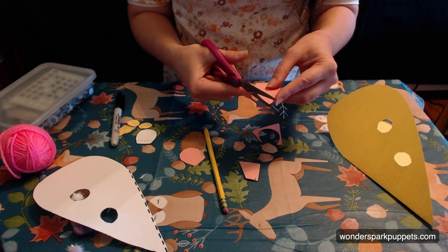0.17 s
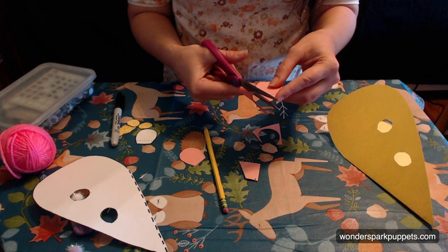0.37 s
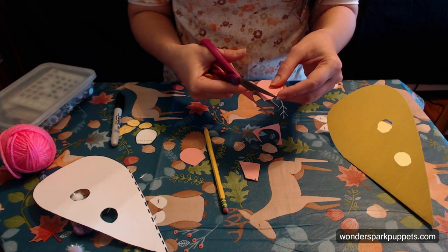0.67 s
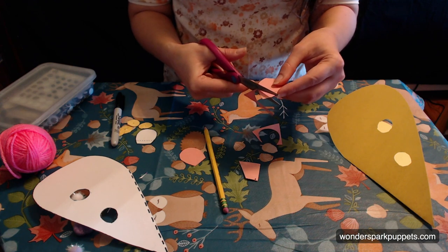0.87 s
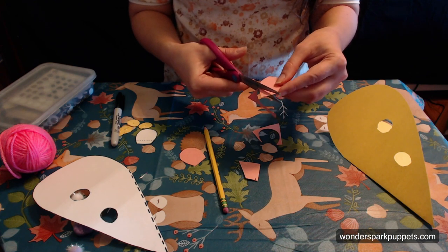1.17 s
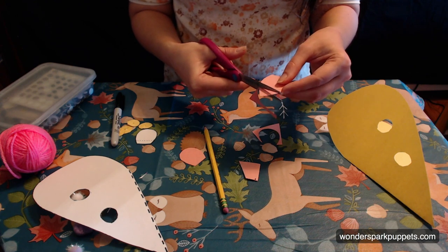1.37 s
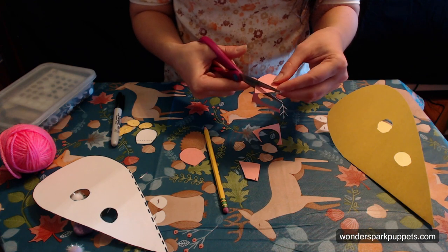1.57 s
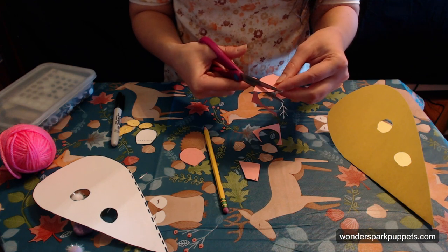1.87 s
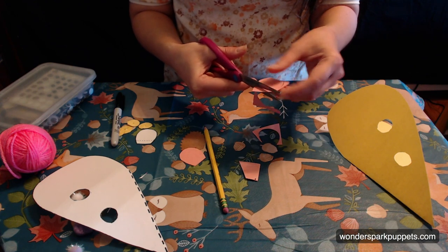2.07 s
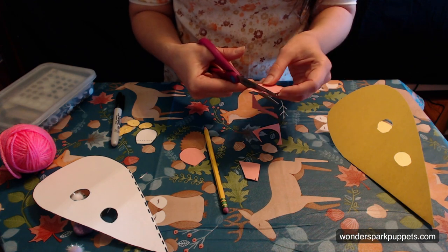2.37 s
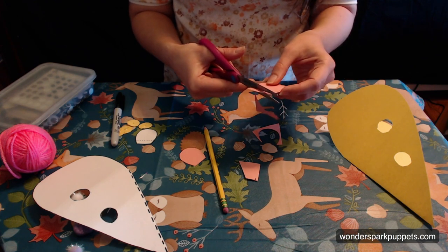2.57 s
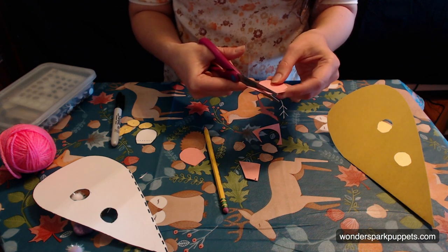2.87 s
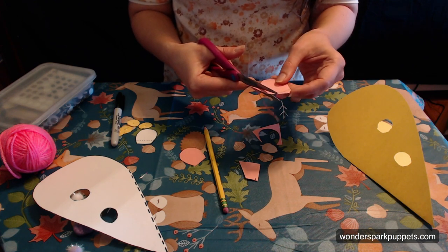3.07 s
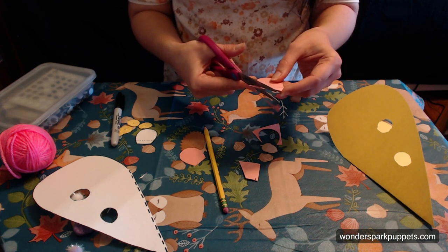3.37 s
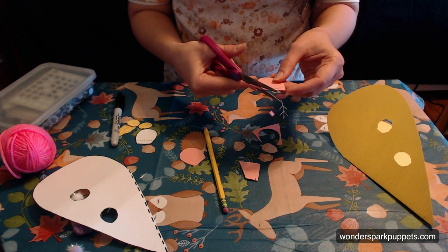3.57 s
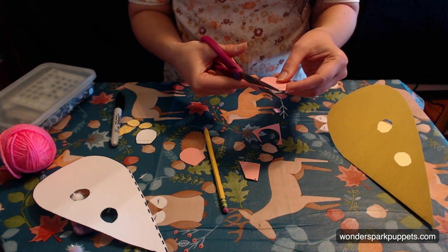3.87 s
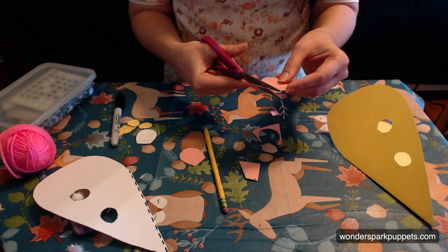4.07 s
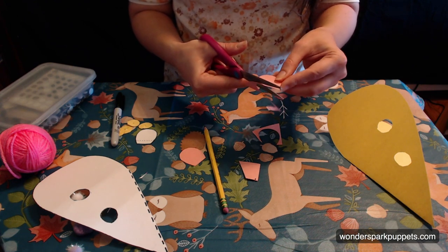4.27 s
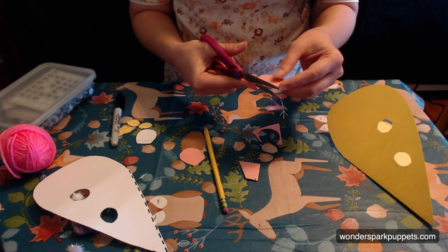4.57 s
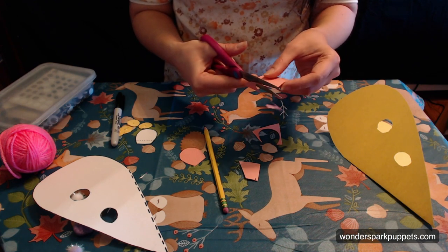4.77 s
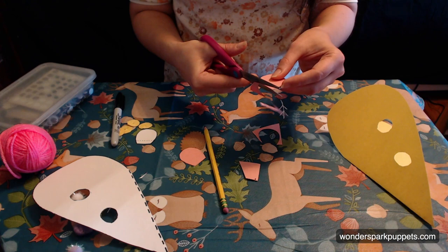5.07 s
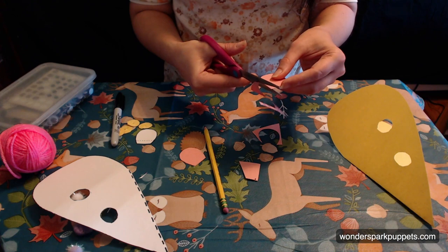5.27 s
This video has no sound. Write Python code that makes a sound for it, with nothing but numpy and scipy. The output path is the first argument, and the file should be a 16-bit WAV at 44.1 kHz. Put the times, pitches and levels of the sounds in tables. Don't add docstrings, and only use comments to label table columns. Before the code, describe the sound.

Close, dry little cuts, snaps and paper rustles from scissors on stiff paper, uneven in rhythm, with soft low room hum beneath.

```python
import sys
import numpy as np
from scipy import signal
from scipy.fft import rfft, irfft
from scipy.io import wavfile
from scipy.ndimage import uniform_filter1d

SR = 44100
rng = np.random.default_rng(int(sys.argv[2]) if len(sys.argv) > 2 else 0)


def volts_from_db(level):
    exponent = np.asarray(level, float) / 20
    return 10 ** exponent


def transcribe(u):
    v = np.clip(np.atleast_2d(u).T, -1, 1)
    q = np.round(v * 32767).astype(np.int16)
    wavfile.write(sys.argv[1], SR, q)


N = 238168

# (time [s], hiss level [dB])
FINGER_PRESSURE = [(0, -67.5), (.45, -70), (.7, -69.5), (.8, -73), (1.05, -79), (1.2, -70), (1.7, -69.5),
                   (1.93, -69), (1.97, -72), (2.2, -68), (2.4, -71.5), (2.53, -67.5), (3.07, -71),
                   (3.4, -71), (3.9, -68.5), (4.4, -69), (4.9, -67.5), (5.4, -68)]


def rms_one(x):
    return x / np.sqrt(np.mean(x ** 2) + 1e-20)


def coloured(points):
    hz = np.arange(N // 2 + 1) * SR / N + 0.1
    at, db = np.transpose(points)
    weight = volts_from_db(np.interp(np.log(hz), np.log(at), db))
    return rms_one(irfft(rfft(rng.standard_normal(N)) * weight, N))


def resonate(x, hz, width_hz):
    r = np.exp(-np.pi * width_hz / SR)
    numerator = [(1 - r * r) / 2, 0, (r * r - 1) / 2]
    denominator = [1, -2 * r * np.cos(2 * np.pi * hz / SR), r * r]
    return signal.lfilter(numerator, denominator, x)


def band(x, low_hz, high_hz):
    return signal.sosfilt(signal.butter(2, [low_hz, high_hz], "band", fs=SR, output="sos"), x)


def flutter(rate_hz):
    r = np.exp(-2 * np.pi * rate_hz / SR)
    slow = signal.lfilter([1], [1, -2 * r, r * r], rng.standard_normal(N + SR))
    return rms_one(slow[SR:])


def in_time(rows):
    s, *columns = np.transpose(rows)
    return [np.interp(np.arange(N) / SR, s, column) for column in columns]


def ventilation():
    # (frequency [Hz], density [dB per Hz])
    room_air = [(26, -14), (48, -10.5), (85, -13), (125, -19), (220, -25.5), (380, -31.5), (710, -43.5),
                (1030, -35), (1500, -38.5), (2350, -37.5), (2850, -45), (4000, -43), (6000, -56.5),
                (11000, -84)]
    # (frequency [Hz], width [Hz], rms level [dB])
    room_tones = [(65.7, 14.7, -62), (197.2, 26.7, -71), (260.6, 12.5, -70.5), (328.7, 22, -74.5),
                  (850, 15, -83.5), (992, 12, -80.5), (1198, 108, -75.5), (2267, 300, -76.5),
                  (2456, 270, -77), (824, 230, -75.5)]
    # (time [s], rumble level [dB], draught level [dB])
    gusts = [(0.0, -47.5, -65), (0.04, -44, -65.5), (0.98, -35, -68), (1.31, -41, -66), (2.92, -37.5, -63),
             (3.01, -47, -64), (3.59, -36.5, -64.5), (4.18, -47.5, -63.5), (4.53, -39, -65.5),
             (5.02, -38.5, -66), (5.13, -46, -65.5), (5.4, -49, -64.5)]
    # (frequency [Hz], density [dB per Hz])
    rumble_colour = [(3, -2.5), (8, 9), (17, 8.5), (27, 3.5), (42, -27), (80, -54)]
    draught_colour = [(250, -21.5), (450, 0), (850, -2.5), (1100, -12), (1800, -57)]

    air = volts_from_db(-56) * coloured(room_air)
    white = rng.standard_normal(N)
    tones = np.zeros(N)
    for hz, width_hz, db in room_tones:
        mode = resonate(resonate(white, hz, width_hz), hz, 2 * width_hz)
        tones += volts_from_db(db) * rms_one(mode)

    hum_hz = 66 + 3.51 * flutter(5.28)
    hum = volts_from_db(-54.5 + 1.43 * flutter(9.6)) * np.sin(2 * np.pi * np.cumsum(hum_hz) / SR)
    whine_hz = 2308
    whine = volts_from_db(-75.5 + 2.7 * flutter(8.3)) * np.sin(2 * np.pi * whine_hz * np.arange(N) / SR)

    rumble_db, draught_db = in_time(gusts)
    rumble = volts_from_db(rumble_db) * coloured(rumble_colour)
    draught = volts_from_db(draught_db - 4.0) * coloured(draught_colour)
    return air + tones + whine + hum + rumble + draught


def fibres(per_s, spread_db):
    strength = volts_from_db(spread_db * np.minimum(rng.exponential(1, N), 4))
    sign = rng.choice([-1, 1], N)
    return strength * sign * (rng.random(N) < per_s / SR) + 1e-18


def card(per_s, spread_db, swell_db):
    # (frequency [Hz], width [Hz], level [dB])
    modes = [(1350, 320, -2.5), (1904, 280, 1), (2118, 200, 0), (2950, 250, -2.5), (3870, 620, 2),
             (5040, 920, 0.5), (5400, 210, 0.5), (5960, 1360, 0.5), (7820, 640, 2), (8000, 125, 0),
             (8700, 840, 2.5), (9420, 220, 0), (10140, 920, 2), (11500, 520, -2)]
    parts = np.zeros((3, N))
    breaks = fibres(per_s, spread_db)
    for k, (hz, width_hz, db) in enumerate(modes):
        part = int(hz > 2500) + int(hz > 6500)
        swell = volts_from_db(db + swell_db * flutter(6.9))
        parts[part] += (-1) ** k * swell * rms_one(resonate(breaks, hz, width_hz))
    return [rms_one(p) for p in parts]


def hiss(parts, rows):
    mid_db, treble_db, body_db = in_time(rows)
    body, mid, treble = parts
    return volts_from_db(mid_db) * (mid + volts_from_db(treble_db) * treble + volts_from_db(body_db) * body)


def sliding():
    treble_db, body_db = -1, -3.5
    rows = [(s, db, treble_db, body_db) for s, db in FINGER_PRESSURE]
    rustle = hiss(card(per_s=9000, spread_db=2.5, swell_db=1.0), rows)
    return volts_from_db(-5 + 1.1 * flutter(36)) * rustle


def shear():
    # (entry time [s], fullest time [s], exit time [s], hiss level [dB], treble over mid [dB])
    strokes = [(0.04, 0.06, 0.098, -64, -1), (.06, 0.108, 0.13, -60.5, -3), (.31, 0.327, .38, -67, 2),
               (.4, .44, .52, -75, -1), (.64, 0.67, .69, -71.5, -2), (1.07, 1.114, 1.2, -70, 0),
               (1.262, 1.27, 1.36, -70, 0), (1.35, 1.362, 1.4, -67, -3), (1.512, 1.53, 1.65, -61.5, -1),
               (1.527, 1.544, 1.63, -56, 3), (1.545, 1.59, 1.609, -55.5, 3.5),
               (1.62, 1.64, 1.62, -62, -1.5), (1.822, 1.86, 1.94, -65, -4), (1.968, 1.975, 2.04, -67, -1),
               (2.03, 2.038, 2.1, -68, 0), (2.117, 2.174, 2.26, -68, 2.5), (2.267, 2.29, 2.38, -67.5, 0),
               (2.335, 2.36, 2.35, -65, -4), (2.4, 2.412, 2.4, -67, -2), (2.557, 2.599, 2.64, -71, 1.5),
               (2.724, 2.73, 2.66, -64, -2), (2.776, 2.787, 2.88, -64, 3), (2.846, 2.868, 2.91, -64, -2),
               (2.912, 2.926, 2.9, -65, -1), (2.947, 2.96, 3.05, -61, 3.5), (3.106, 3.13, 3.22, -64, 2),
               (3.153, 3.196, 3.24, -59.5, 2.5), (3.2, 3.235, 3.26, -59.5, 3.5),
               (3.42, 3.43, 3.52, -66.5, 1), (3.54, 3.58, 3.6, -67.5, 2), (3.785, 3.8, 3.8, -66, -1),
               (4.004, 4.014, 4.1, -72, 0), (4.175, 4.193, 4.3, -64.5, 2), (4.19, 4.235, 4.2, -63, 1),
               (4.24, 4.288, 4.315, -62, 3), (4.478, 4.5, 4.43, -67, 5), (4.602, 4.723, 4.6, -70.5, -1),
               (4.92, 4.94, 4.87, -69.5, 6.5), (5.352, 5.38, 5.5, -61, .6)]
    entry_db, exit_db = -7.5, -8
    fade_db_per_s = 1602
    body_at_59_db, body_loss = -7, 0.28

    s = np.arange(0, N / SR + 0.002, 0.002)
    outline_db = np.array([-fade_db_per_s / 10, entry_db, 0, exit_db, -fade_db_per_s / 5])
    swells = []
    for entry, fullest, leave, db, _ in strokes:
        corners = [entry - 0.1, entry, fullest, leave, leave + 0.1]
        swells.append(np.interp(s, corners, db + outline_db))
    level_db = np.max(swells, axis=0)

    _, fullest, _, db, treble_db = np.transpose(strokes)
    body_db = body_at_59_db - body_loss * (db + 59.0)
    rows = np.transpose([s, level_db, np.interp(s, fullest, treble_db), np.interp(s, fullest, body_db)])
    stick_slip = volts_from_db(0.85 * flutter(66))
    return stick_slip * hiss(card(per_s=9000, spread_db=3.0, swell_db=0.5), rows)


def singing():
    # (time [s], length [s], frequency [Hz], rms level [dB])
    blade_tones = [(.04, 0.033, 4200, -72), (0.067, 0.055, 3880, -70), (.075, 0.05, 8400, -67.5),
                   (.07, .04, 6700, -69), (0.08, 0.043, 1405, -67), (.335, .04, 10250, -72),
                   (1.086, .04, 4050, -70), (1.354, 0.019, 8500, -66), (1.355, .025, 6000, -71),
                   (1.527, .045, 3920, -62), (1.533, 0.045, 4640, -61), (1.542, 0.056, 7730, -61),
                   (1.532, .03, 9250, -62), (1.559, .045, 10100, -63), (1.565, 0.054, 5120, -65.5),
                   (1.543, 0.015, 1880, -64), (1.589, 0.021, 1610, -60.5), (1.538, 0.064, 3080, -67),
                   (1.57, 0.04, 11300, -63), (1.885, 0.011, 1890, -60), (1.965, 0.0079, 1900, -67),
                   (1.975, .02, 2950, -69), (2.077, 0.019, 2850, -63), (2.41, 0.017, 2070, -64),
                   (2.562, 0.015, 2100, -66), (2.59, 0.027, 8800, -73), (2.64, 0.023, 8900, -70),
                   (2.783, 0.028, 3160, -64), (2.784, 0.022, 4400, -61), (2.784, 0.011, 5480, -59),
                   (2.782, .012, 8160, -54), (2.871, .012, 9200, -58), (2.95, .015, 2060, -73),
                   (3.171, 0.22, 2273, -73), (3.175, .02, 8800, -66), (3.422, .015, 2660, -64),
                   (3.55, .01, 8400, -65), (3.572, 0.012, 1980, -62.5), (3.576, .03, 10200, -62),
                   (3.575, 0.026, 3750, -68), (3.618, 0.024, 9150, -63), (4.141, 0.016, 3460, -68),
                   (1.54, 0.051, 5900, -66), (4.234, 0.033, 3630, -71), (4.239, 0.064, 10240, -69),
                   (4.265, .025, 8850, -70), (4.27, .03, 10200, -68), (4.289, 0.0088, 1830, -61),
                   (5.356, 0.082, 1935, -66), (5.359, 0.077, 4020, -68), (5.362, 0.035, 7240, -65)]
    # (time [s], length [s], frequency [Hz], rms level [dB])
    table_hums = [
        (3.12, 0.15, 78, -62),
        (3.28, 0.12, 95, -59.5),
        (3.47, 0.1, 104, -59),
        (3.55, 0.12, 89, -57),
        (2.3, 0.14, 68, -57),
    ]
    rise = 0.15
    size = 6000
    out = np.zeros(N + SR)
    for s, length_s, hz, db in blade_tones + table_hums:
        u = np.arange(size) / SR / max(length_s, 0.004)
        rub = rng.standard_normal(size) * np.sqrt(np.interp(u, [0, rise, 1], [0, 1, 0]))
        width_hz = 49 + 25.2 * hz / 1000
        tone = resonate(resonate(rub, hz, width_hz), hz, 2 * width_hz)
        i = round(s * SR)
        out[i:i + size] += volts_from_db(db) * rms_one(tone) * np.sqrt(length_s * SR / size)
    return out[:N]


def tear(length_ms, peak_db, size=1400, lead=256):
    t = (np.arange(size) - lead) / SR
    decay_s = max(length_ms, 0.3) / 1000
    rise_s = 0.00083 + 0.27 * decay_s * np.clip((-41 - peak_db) / 8, 0.05, 1)
    shape = np.exp(np.where(t < 0, t / rise_s, -t / (0.92 * decay_s)))
    return rng.standard_normal(size) * volts_from_db(2.0 * rng.standard_normal(size)) * shape


def add(out, s, peak_db, burst, lead=256):
    i = round(s * SR) - lead
    crest = 2 * np.sqrt(uniform_filter1d(burst ** 2, size=48).max())
    out[i:i + len(burst)] += volts_from_db(peak_db) * burst / crest


def strays():
    count, over_slide_db, spread_db = 8, 9, -1
    when, size, pitch = rng.random((count, 3)).T
    s = 0.01 + when * (N / SR - 0.02)
    db = np.interp(s, *np.transpose(FINGER_PRESSURE)) + over_slide_db - spread_db * np.log(size)
    return list(zip(s, np.minimum(db, -53), 3300 * 3.1 ** pitch))


def ticks():
    # (time [s], peak level [dB], ring frequency [Hz])
    brief_ticks = [(0.043, -47, 4140), (0.051, -51, 4250), (.109, -44, 4020), (.312, -53, 9500),
                   (.358, -49, 10300), (0.365, -46, 10300), (.43, -54, 8500), (.481, -52, 8000),
                   (1.082, -48, 8700), (1.092, -53, 4100), (1.122, -49, 6000), (1.141, -48, 8600),
                   (1.227, -43.5, 2350), (1.264, -45.5, 8600), (1.267, -45, 4090), (1.281, -48, 9500),
                   (1.301, -47, 5500), (1.83, -44, 5530), (1.8345, -43, 5000), (1.919, -46, 3480),
                   (2.072, -43, 7700), (2.2732, -42.5, 3960), (2.354, -45, 3200), (2.413, -47, 7500),
                   (2.458, -53, 8000), (2.495, -51, 8800), (2.644, -46, 3200), (2.654, -50, 8900),
                   (2.705, -46, 3450), (2.739, -42, 6070), (2.822, -47, 6500), (2.85, -44, 10400),
                   (2.949, -44, 3800), (3.103, -53, 9500), (3.4643, -43, 6630), (3.646, -42, 10340),
                   (3.676, -47, 9300), (3.728, -46, 9800), (3.8, -49, 6800), (3.864, -54, 8700),
                   (4.0, -47, 6500), (4.009, -46, 3900), (4.0248, -43.5, 6720), (4.033, -56, 9000),
                   (4.07, -53, 10500), (4.103, -53, 9000), (4.142, -47.5, 3380), (4.503, -44, 6540),
                   (4.524, -48, 7000), (4.582, -44.5, 7100), (4.8005, -44, 8690), (4.805, -45, 3870),
                   (4.924, -47, 9600), (4.941, -49, 9500), (4.991, -43, 9300), (5.159, -47, 6500),
                   (5.172, -48, 7480),
                   (.3506, -48, 10250), (.4335, -54, 3960), (.439, -54, 2330), (.6607, -53, 4180),
                   (.9578, -55, 2930), (1.1193, -51, 4090), (1.8173, -52, 3750), (1.86, -45, 4090),
                   (2.3651, -48, 4390), (2.5554, -49, 8700), (2.6107, -52, 8900), (2.6964, -48, 3570),
                   (2.8715, -45, 7000), (3.0317, -48, 10100), (3.4885, -50, 5512), (3.7321, -48, 6070),
                   (3.7875, -47, 9000), (3.861, -51, 2070), (4.0057, -49, 6680), (4.3567, -53, 8800),
                   (4.3656, -52, 2150), (4.7562, -49, 2894), (4.8498, -52, 3570), (4.8834, -49, 3400),
                   (5.089, -46, 8180), (5.1996, -54, 2240), (5.2115, -55, 4000)]
    out = np.zeros(N + 2048)
    for s, peak_db, hz in brief_ticks + strays():
        release = tear(1.86, peak_db)
        ring = volts_from_db(9.5) * resonate(release, hz, 520)
        add(out, s, peak_db - 4.5, band(release, 1800, 11400) + ring)
    return out[:N]


def snaps():
    # (time [s], peak level [dB], low ring [Hz], high ring [Hz], treble over mid [dB])
    bites = [(1.1112, -46.5, 4160, 6060, -1), (1.857, -49, 4550, 8650, -6), (1.861, -51, 4130, 10200, 5),
             (1.97, -37.5, 4040, 8000, -25), (2.0277, -39.5, 4030, 5600, -3), (2.0352, -49, 4400, 9260, -8),
             (2.0392, -43, 5600, 6870, -11), (2.0823, -43, 5060, 7700, -4), (2.719, -48.5, 5600, 8830, 7),
             (2.731, -41.5, 3060, 7000, 4), (2.866, -47, 2950, 7500, -1), (2.9149, -44, 3980, 7280, -1),
             (2.925, -40.5, 5000, 10500, 5), (2.9597, -35.5, 3820, 9050, -4), (2.972, -41, 3870, 10700, 12),
             (3.0017, -41, 3940, 6600, 16), (3.0235, -41.5, 5400, 10000, 5), (3.497, -44.5, 2180, 8300, 4),
             (3.545, -44, 3870, 6260, -8), (3.5522, -42.5, 4870, 8420, -5), (3.594, -51, 5730, 10100, 11),
             (3.791, -39.5, 3900, 10200, 3), (3.817, -41, 3870, 5700, 0), (4.2936, -44, 1830, 8600, -1)]
    # (time [s], peak level [dB], low ring [Hz], high ring [Hz], tear length [ms])
    rips = [(.338, -52, 4200, 10140, 5.4), (.6277, -48, 4090, 7000, 3.9), (1.3605, -45.5, 4000, 8500, 2.3),
            (1.885, -50, 5500, 10400, 4), (1.891, -44, 4620, 7200, 5.1), (1.9765, -51, 3950, 7900, 4.3),
            (2.0887, -45, 2330, 5830, 3.5), (2.5643, -45, 3730, 7200, 5.4), (2.7765, -47, 5400, 8300, 2.5),
            (2.7844, -38, 3040, 7340, 4.1), (2.876, -38.5, 3860, 10700, 2.7), (2.883, -50, 4000, 9110, 3.3),
            (2.932, -47, 3040, 10500, 6.1), (2.9567, -37.5, 3500, 9700, 7.5), (2.987, -52, 6200, 8800, 1.5),
            (3.012, -47, 6500, 9900, 1.5), (3.037, -50, 3360, 10620, 2.3), (3.18, -49, 2230, 8950, 8.4),
            (3.429, -45.5, 5500, 7460, 4.4), (3.503, -47, 5340, 7540, 3.9), (3.5727, -42, 5560, 10000, 8.4),
            (3.577, -39, 5000, 9900, 6), (3.625, -44.5, 5630, 6000, 7.5), (4.488, -48, 5497, 7200, 4.5),
            (5.095, -47.5, 5630, 8340, 6.8), (5.368, -58, 4060, 8000, 8)]
    # (frequency [Hz], width [Hz], level [dB])
    steel_modes = [(3040, 68, -10), (4090, 190, 5), (5400, 280, 5), (8300, 100, 5), (10700, 330, 4)]
    steel_spread_db = 3.5

    cracks = []
    for s, peak_db, low_hz, high_hz, treble_db in bites:
        length_ms = 0.56 + 0.22 * (-38 - peak_db)
        cracks.append((s, peak_db, low_hz, high_hz, treble_db, length_ms))
    for s, peak_db, low_hz, high_hz, length_ms in rips:
        treble_db = -1 + 7 * np.log2(high_hz / 8000)
        cracks.append((s, peak_db, low_hz, high_hz, treble_db, length_ms))

    out = np.zeros(N + 2048)
    for s, peak_db, low_hz, high_hz, treble_db, length_ms in cracks:
        crack = tear(length_ms, peak_db)
        low = band(crack, 1560, 7800) + volts_from_db(14) * resonate(crack, low_hz, 230)
        high = volts_from_db(-4.0) * band(crack, 4900, 11000) + volts_from_db(6.0) * resonate(crack, high_hz, 590)
        steel = np.zeros(len(crack))
        for hz, width_hz, db in steel_modes:
            strike = volts_from_db(db + steel_spread_db * rng.standard_normal())
            steel += strike * resonate(crack, hz, width_hz)
        burst = rms_one(low) + volts_from_db(treble_db) * rms_one(high) + volts_from_db(-11.5) * rms_one(steel)
        add(out, s, peak_db, burst)
    return out[:N]


def knocks():
    # (time [s], peak level [dB], ring frequency [Hz])
    contacts = [(.918, -56, 1030), (1.225, -55, 786), (2.543, -57, 850), (2.597, -58, 560),
                (2.727, -51, 850), (2.786, -53, 885), (2.956, -53, 826), (3.011, -57, 850),
                (3.544, -47, 910), (3.551, -58, 700), (3.576, -60, 550), (3.659, -55, 730),
                (3.839, -54, 845.5), (4.101, -55.5, 755), (4.144, -57, 865), (4.292, -53, 690),
                (4.445, -53.5, 790), (4.542, -60, 797), (4.794, -60, 795)]
    size = 4096
    out = np.zeros(N + size)
    t = np.arange(size) / SR
    envelope = (1 - np.exp(-t / 0.00051)) * np.exp(-t / 0.0082)
    for s, peak_db, hz in contacts:
        puff = rng.standard_normal(size) * envelope
        thud = resonate(puff, hz, 71) + 0.024 * band(puff, 330, 2000)
        i = round(s * SR)
        out[i:i + size] += volts_from_db(peak_db) * thud / np.abs(thud).max()
    return out[:N]


def room(x):
    t60_s = 0.2
    t = np.arange(SR // 2) / SR
    tail = rng.standard_normal(len(t)) * volts_from_db(-60 * t / t60_s) * (t > 0.003)
    return signal.fftconvolve(x, tail / np.sqrt(np.sum(tail ** 2)))[:N]


def scene():
    hands = sliding() + shear() + singing() + ticks() + snaps() + knocks()
    reflections = volts_from_db(-8.5) * room(hands)
    return (hands + reflections + ventilation())[None]


def roll_off(x):
    return signal.sosfilt(signal.butter(12, 12240, fs=SR, output="sos"), x)


def record(dry):
    edges_hz = [11650, 11900, 12200]
    dull = signal.sosfilt(signal.butter(6, 11600, fs=SR, output="sos"), dry)
    hz = np.arange(N // 2 + 1) * SR / N
    below = [irfft(rfft(dull) * (hz < edge), N) for edge in edges_hz]

    gate = uniform_filter1d(rng.random(N // 1024 + 1), size=2)
    gate = np.repeat(gate, 1024)[:N]
    first, second = [uniform_filter1d(1.0 * (gate > share), size=512) for share in (0.36, 0.66)]
    mix = below[0] + first * (below[1] - below[0]) + second * (below[2] - below[1])
    return roll_off(mix)


dry = scene()
out = record(dry)
transcribe(out)
```